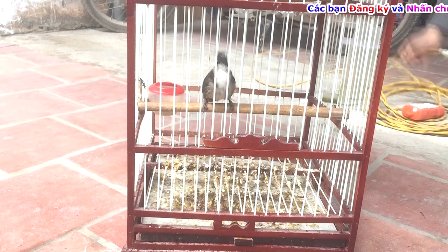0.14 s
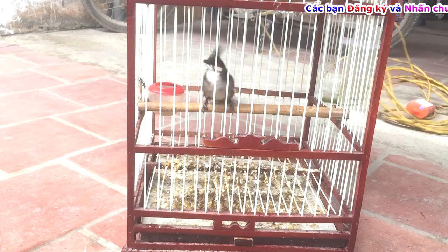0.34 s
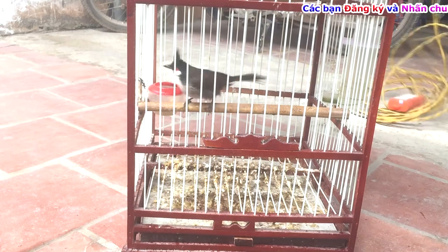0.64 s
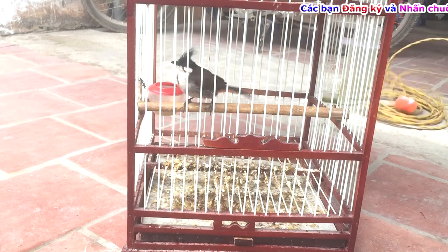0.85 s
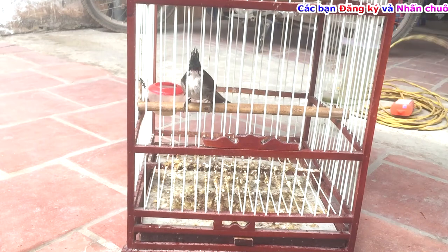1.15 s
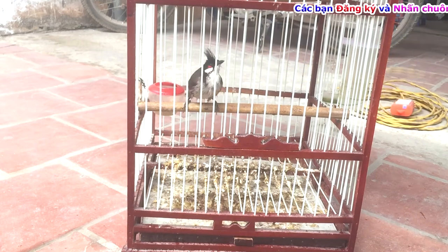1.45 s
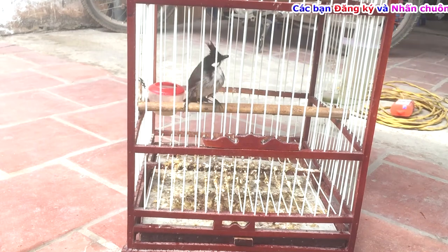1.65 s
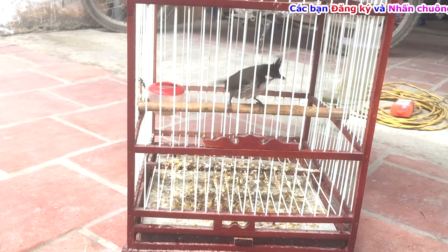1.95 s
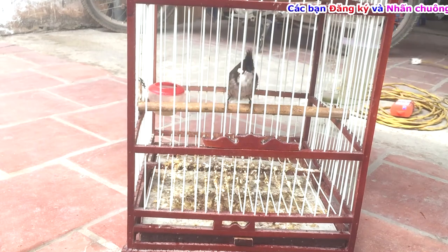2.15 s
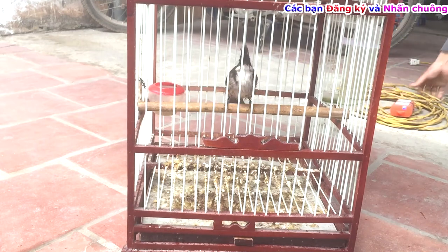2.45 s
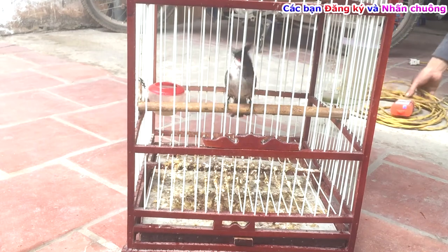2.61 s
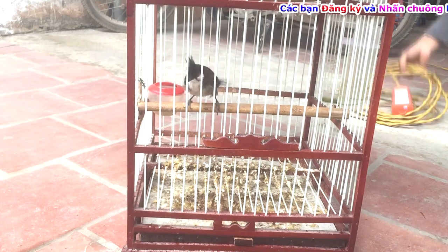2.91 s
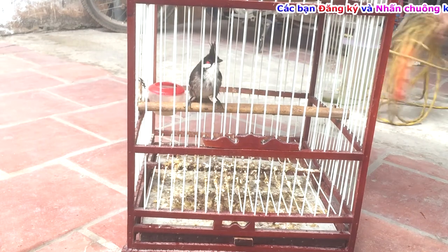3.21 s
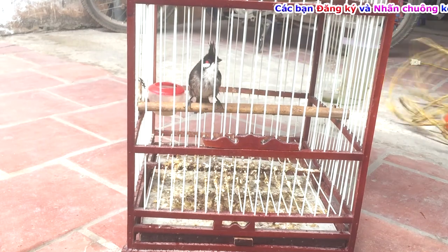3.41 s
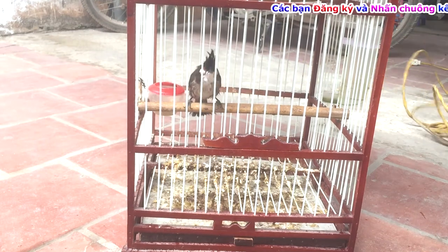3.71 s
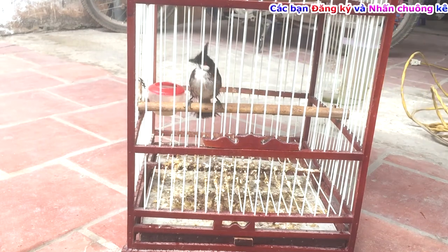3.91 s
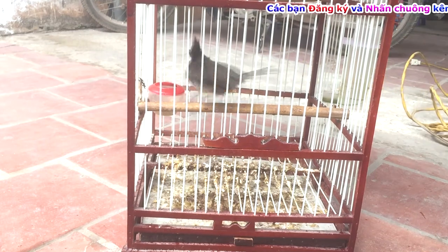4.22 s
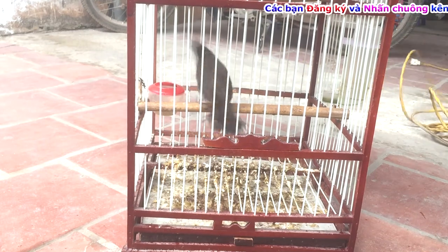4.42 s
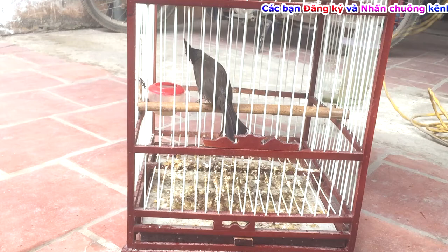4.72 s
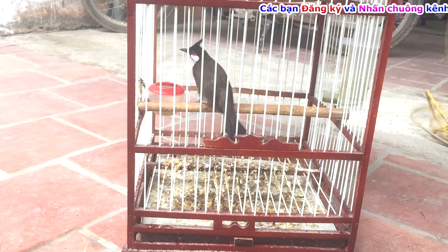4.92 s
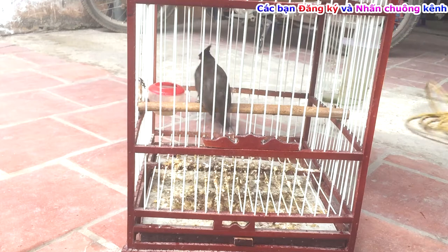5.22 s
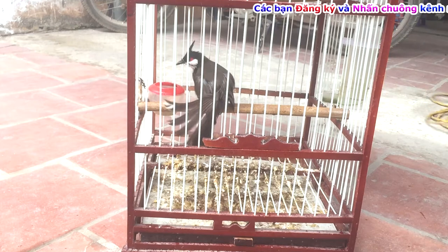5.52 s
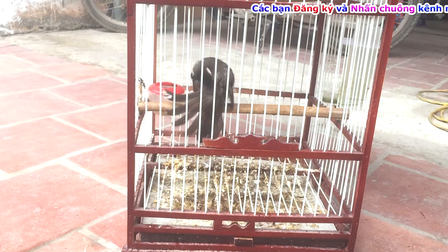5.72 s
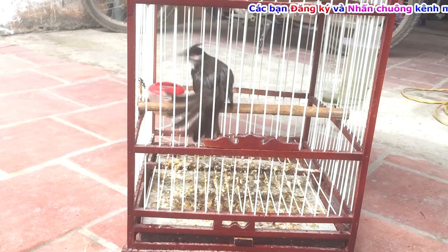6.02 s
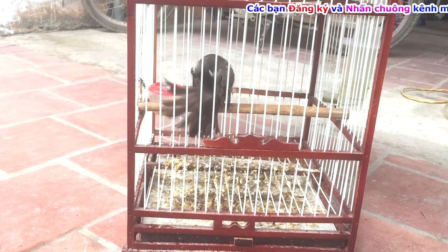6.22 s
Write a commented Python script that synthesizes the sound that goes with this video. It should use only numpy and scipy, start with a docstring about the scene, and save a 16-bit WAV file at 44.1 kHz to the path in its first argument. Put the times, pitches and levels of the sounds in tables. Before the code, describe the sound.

A tiled, walled yard with short bright echoes, heard from one microphone. The tail of a chirp opens over faint air and low traffic. From 0.25 to 1.1 seconds a cord slaps and rasps across the paving; its hollow plastic box knocks strongly at 0.94 and more softly at 1.22. A quick warbling chirp comes at 1.6, with light claw ticks and a feather flutter around 1.7 to 1.8. Faint far whistles follow, then the plug hits with one hard, bright clack at 2.22. Light cord rustles resume near 2.9, a box bump at 3.2, and a stronger knock and gritty drags from 3.45 to 3.8. Another chirp sounds at 3.86. Around 4 to 4.9 it is quieter, with tiny ticks, soft wing air and distant chirps. From 5.1, sharp slaps and sandy scraping return, fading after 6. A distant motorbike hums low, mostly before 4.7.

```python
"""A walled, tiled yard at one microphone: a cord is coiled up behind a caged songbird that hops, flutters and chirps.
The cord slaps and drags over the paving, its socket box knocks and its plug clacks down once: noise bursts and
clicks ring their resonances. Claws and feathers are filtered noise and clicks, birdsong is gliding sines.
Decaying noise makes the walls answer all of these; far off, dry, lie a motorbike of three sines and noise
for air and traffic."""
import sys
import numpy as np
from scipy import signal
from scipy.fft import rfft, irfft
from scipy.io import wavfile
from scipy.ndimage import uniform_filter1d

SR = 44100
rng = np.random.default_rng(int(sys.argv[2]) if len(sys.argv) > 2 else 0)


def store_pcm(level_fs):
    """Save levels as 16-bit WAV."""
    pcm = np.round(np.clip(level_fs, -1, 1) * 32767).astype(np.int16)
    wavfile.write(sys.argv[1], SR, np.atleast_2d(pcm).T)


N = 280035
TIME = np.arange(N) / SR  # s

# Loops of cord slapping the paving; the blow at 3.527 s is probably the socket box's second bump.
# Each row: time in s, level in dB, tick and thud in dB relative to it.
CORD_SLAPS = [(0.302, -29, -13, -12), (0.491, -39, -15, -3), (0.557, -38, -14, -27),
              (0.600, -29.5, -20, -33), (0.632, -27, -11, -24), (1.131, -35, -17, -28),
              (1.195, -32.5, -41, -13), (2.181, -39.5, -3.5, -12), (2.8, -38.5, -18, -15),
              (2.914, -38.5, -20, -21), (2.941, -36.5, -15.5, -15), (3.029, -37, -13.5, -24),
              (3.149, -40.5, -17, -17), (3.435, -40, -14.5, -26), (3.527, -32.5, 3.5, 6.5),
              (3.694, -34, -15, -19), (3.731, -41, 2, -14), (3.767, -28.5, -6.5, -21),
              (3.815, -29, -13.5, -29), (4.669, -50, -8, -16), (5.085, -38.5, -6, -14.5),
              (5.124, -27, -10.5, -18), (5.145, -23, -11.5, -29), (5.359, -26.5, -10.5, -38),
              (5.475, -41, -4, -25), (5.521, -37, -7, -34), (5.893, -35, -8, -7), (6.091, -39, 0.5, -7)]
# Pulls dragging the cord. Each row: start, swell and fade in s, level in dB,
# then rasp, grit and rumble in dB relative to it, before the mix trims in cord_drag.
CORD_PULLS = [(0.249, 0.044, 0.15, -41.5, -8.5, -14.5, -2), (0.543, 0.017, 0.57, -37.5, -4.5, -9, -22),
              (1.1, 0.035, 0.13, -46.5, -4.5, -11, -13), (2.905, .03, 0.43, -48, -6, -23, -8),
              (3.439, 0.11, 0.095, -31, -8.5, -7.5, -7), (3.715, 0.087, .1, -27.5, -9.5, -5.5, -17.5),
              (5.088, 0.11, .28, -27.5, -10, -6.5, -13.5), (5.321, 0.042, 0.22, -37, -12.5, -4.5, -13),
              (5.411, 0.12, 0.1, -44, -12, -7.5, -3.5), (5.584, 0.022, .17, -35.5, -9, -5.5, -10.5),
              (5.63, 0.044, .22, -36, -18, -10, -4), (5.79, .2, 0.36, -29, -13, -8.5, -5)]
# Broad spectra of the cord: coil body, rasp, sandy grit, rumble, thud on paving. Each row: frequency in Hz, dB.
COIL_SPECTRUM = [(300, -30.5), (620, -3.5), (850, 4.5), (1300, 5), (2100, -4), (3200, -4), (4500, -21),
                 (7000, -35)]
RASP_SPECTRUM = [(900, -20.5), (1600, 2.5), (2300, -1.5), (3100, -3), (4500, -21)]
GRIT_SPECTRUM = [(2000, -0.5), (4000, 5.5), (6200, 1.5), (7500, -3.5), (9500, -9), (12000, -6.5),
                 (16000, -10.5)]
RUMBLE_SPECTRUM = [(80, -14), (140, 0), (240, 1.5), (340, -6.5), (550, -8.5), (900, -27.5)]
THUD_SPECTRUM = [(50, -33), (105, 5.5), (160, 2.5), (240, 2.5), (340, -7), (500, -8), (900, -38)]
# Rings of the coil on tile and of the scraping. Each row: frequency in Hz, width in Hz, lift in dB.
COIL_RINGS = [(818.6, 26, 11), (994, 78, 10.5), (1105, 47, 5), (1244, 74, 11), (1390, 30, -0.5),
              (1596, 10, -2.5), (1743, 32, 11.5), (2055, 170, 10.5), (2810, 59, 8)]
GRIT_RINGS = [(4100, 100, 4), (5330, 140, 6), (6060, 260, 5), (8510, 150, 6.5), (9270, 320, 8),
              (11300, 120, 7)]
# The socket box bumps on the ground. Each row: time in s, level in dB, tick and thud in dB relative to it.
SOCKET_KNOCKS = [(0.9385, -16.5, -22, -7), (1.2215, -26, -22.5, -2.5), (3.2068, -31.5, -20, -3),
                 (3.4865, -22, -10.5, -2)]
# Spectrum of the socket box. Each row: frequency in Hz, dB.
SOCKET_SPECTRUM = [(250, -11.5), (550, -11), (800, -2.5), (1500, 0.5), (2300, -6), (3600, -10.5),
                   (5500, -20.5), (8000, -23.5)]
# Its hollow ring. Each row: frequency in Hz, width in Hz, lift in dB.
SOCKET_RINGS = [(804, 150, 11.5), (1040, 28, -1), (1224, 33, 5.5), (1720, 47, 2), (1900, 53, 9),
                (2743, 63, 4.5), (3250, 24, 9)]
# The plug touches, lands and rebounds. Each row: time in s, level in dB before the two paths, brightness in Hz.
PLUG_CONTACTS = [(2.217, -25.5, 2000), (2.2176, -10.5, 12000), (2.2233, -28, 2400)]
# Spectrum of the plug. Each row: frequency in Hz, dB.
PLUG_SPECTRUM = [(60, -17), (180, -10), (550, -2), (1000, -1.5), (1700, 2), (2600, 3), (3400, -1),
                 (7000, -6.5), (12000, -5.5), (16000, -6.5)]
# Ring of the plug, direct. Each row: frequency in Hz, width in Hz, lift in dB.
PLUG_RINGS = [(1420, 73, 9), (1555, 66, 6), (2347, 220, 1.5), (2570, 200, 1.5), (4580, 180, 8),
              (5400, 190, 6.5), (8540, 560, 13.5), (9800, 630, 9.5), (13900, 900, 12.5)]
# Light ticks of claws on perch and bars. Each row: time in s, level in dB.
CLAW_TICKS = [(0.14, -50.5), (0.285, -50), (1.707, -46), (1.7744, -39), (1.815, -39), (2.012, -49),
              (2.1109, -55.5), (4.368, -60), (4.3914, -58), (4.7177, -45.5), (4.799, -46.5)]
# Wing flutters. Each row: start, swell and fade in s, level in dB, air puff in dB relative to it.
WING_FLUTTERS = [(1.703, 0.12, 0.028, -48, -7), (3.96, 0.16, 0.092, -55.5, -17),
                 (4.708, .06, 0.26, -58, 13.5)]
# Spectra of claws, feather rustle and pushed air. Each row: frequency in Hz, dB.
CLAW_SPECTRUM = [(800, -6.5), (3500, -1), (8000, -2.0), (15000, -6)]
FEATHER_SPECTRUM = [(200, -30.5), (700, -6), (2500, 7.5), (5000, -4), (9000, -5), (15000, -12)]
PUFF_SPECTRUM = [(100, -21.0), (220, 7.5), (350, 2), (600, -9.5), (1200, -7.5)]
# The near bird's chirps. Each row: time of the crest in s, crest pitch in Hz,
# level in dB before the two paths, octave in dB relative to it.
NEAR_CHIRPS = [(-0.025, 3108, -31.5, -24.5), (1.608, 3264, -34, -36.5), (3.856, 3290, -32.5, -45)]
# Far birds' whistles. Each row: start and length in s, start and end pitch in Hz,
# level in dB before the two paths, trill swing in Hz.
FAR_WHISTLES = [(1.835, 0.22, 1637, 1575, -58.5, 199.5), (1.85, .27, 2204, 2074, -62.5, 301),
                (2.546, .122, 7380, 5360, -54.5, -1100), (4.532, 0.043, 2355, 2310, -63.5, 100.5),
                (4.745, 0.062, 2800, 2750, -57, -200), (4.791, .05, 3136, 3150, -55.5, 48),
                (4.983, 0.017, 3200, 3140, -63, 30.5)]
# Far motorbike. Each row: time in s, pitch of its strongest line in Hz, level in dB; both waver a little.
ENGINE_LINE = [(0, 113.2, -52), (0.75, 114, -66), (1.15, 122, -49), (1.5, 127.8, -45.5), (2.15, 127.5, -58),
               (2.42, 116.9, -48), (3.1, 115.5, -50.5), (3.35, 110.6, -57), (3.7, 103.4, -46.5),
               (4.02, 104.6, -60), (4.35, 106, -46.5), (4.75, 104, -74), (6.35, 98, -70)]
# Its lower neighbour line, which swells as it pulls. Each row: time in s, level in dB.
ENGINE_PULL = [(0, -60), (1.3, -58.5), (1.6, -51.5), (2.1, -46), (2.3, -55), (6.35, -91)]
# Spectra of open air and traffic rumble. Each row: frequency in Hz, dB.
AIR_SPECTRUM = [(15, -47), (25, -17), (82, -5.5), (123, 2), (200, -10), (263, -5), (427, -24.5),
                (641, -14.5), (734, -28), (962, -19), (2350, -27), (3720, -34.5), (12500, -46),
                (16000, -51)]
TRAFFIC_SPECTRUM = [(32, -29), (50, 1.0), (80, -1.5), (140, -0.5), (270, -12.5), (600, -24.5)]
# Slow swell of the traffic. Each row: time in s, dB relative to its base level.
TRAFFIC_SWELL = [(0, -2.5), (0.9, 6.5), (1.8, 8.5), (2.7, 2.5), (3.8, 2), (4.7, -2), (6.35, 2)]
# Reverberation of the yard. Each row: frequency in Hz, time to fall by 60 dB in s.
YARD_DECAY = [(150, 0.31), (400, 0.81), (1000, 0.66), (2700, 0.64), (6000, 0.52), (10000, .42),
              (15000, 0.27)]

# chirp timing (s)
CHIRP_RISE_S, CHIRP_HOLD_S, CHIRP_RELEASE_S = 0.03, 0.058, 0.021
# level lost over the rise or release time, and over the hold
CHIRP_EDGE_DB, CHIRP_SINK_DB = 21, 5.5
# rise to the crest, fall over the hold, deepest dip below the crest
CHIRP_SCOOP_HZ, CHIRP_SAG_HZ, CHIRP_TRILL_HZ = 405, 72, 1017.4
# dips are brief at the crest (exponent 4) and lengthen over this time
TRILL_OPEN_S, TRILL_BREVITY = 0.04, 4


def cord_slaps():
    """Blows on the tiles, mostly dropping loops of cord, ring the coil."""
    return blows(CORD_SLAPS, COIL_SPECTRUM, COIL_RINGS, contact_ms=3.2, wet_db=-2)


def cord_drag(body_db=-4, grit_trim_db=-6, rumble_trim_db=-5):
    """Catches on the tiles make dense clicks that ring the coil; rasp and sandy grit come and go with the ground."""
    catches = grains(rate=2200, spread_db=2.5) * undb(1.6 * walk(60))
    body = unit(colour(catches, COIL_SPECTRUM, COIL_RINGS))

    rasp = colour(grains(rate=1500, spread_db=-2.5), RASP_SPECTRUM)
    rasp = unit(rasp * undb(1.5 * walk(25)))

    sand = grains(rate=450, spread_db=1.5)
    grit = colour(catches + sand, GRIT_SPECTRUM, GRIT_RINGS)
    grit = unit(grit * undb(1.3 * walk(30)))

    rumble = unit(colour(grains(rate=2200, spread_db=1), RUMBLE_SPECTRUM))

    out = np.zeros(N)
    for start_s, swell_s, fade_s, db, rasp_db, grit_db, rumble_db in CORD_PULLS:
        scrape = undb(body_db) * body + undb(rasp_db) * rasp
        scrape += undb(grit_db + grit_trim_db) * grit
        scrape += undb(rumble_db + rumble_trim_db) * rumble
        speed = stroke(start_s, swell_s, fade_s, swell_db=17.5, fade_db=33)
        out += speed * undb(db) * scrape
    return yard(out, wet_db=-6)


def socket_knocks():
    """The hollow socket box is tugged over and bumps down."""
    return blows(SOCKET_KNOCKS, SOCKET_SPECTRUM, SOCKET_RINGS, contact_ms=3.4, wet_db=-1)


def blows(rows, body, rings, contact_ms, wet_db, lead_s=0.0065, lead_db=-19):
    """Each blow has a faint noise lead-in, then lands with a ringing body, a gritty tick and a soft thud."""
    near, around = np.zeros(N), np.zeros(N)
    for s, db, tick_db, thud_db in rows:
        parts = (
            (body, rings, db),
            (GRIT_SPECTRUM, GRIT_RINGS, db + tick_db),
            (THUD_SPECTRUM, (), db + thud_db),
        )
        for points, part_rings, part_db in parts:
            lead_in = colour(contact(2 * contact_ms), points, part_rings)
            landing = colour(contact(contact_ms), points, part_rings)
            add(near, s - lead_s, lead_in, part_db + lead_db)
            add(near, s, landing, part_db)
            add(around, s, colour(tap(), points, part_rings), part_db)
    return near + undb(wet_db) * echoes(around, early_db=0.5)


def plug(direct_db=1, wet_db=-3, wall_ring=0.59):
    """Hard plastic on tile: a push and a millisecond of chatter ring the shell; the walls hear it more evenly."""
    near, around = np.zeros(N), np.zeros(N)
    wall_rings = [(hz, width, wall_ring * lift_db) for hz, width, lift_db in PLUG_RINGS]
    for s, db, bright_hz in PLUG_CONTACTS:
        softness = signal.butter(1, bright_hz, fs=SR)
        push = signal.lfilter(*softness, tap() + 0.28 * contact(ms=0.7))
        wall_push = signal.lfilter(*softness, tap())
        add(near, s, colour(push, PLUG_SPECTRUM, PLUG_RINGS), db)
        add(around, s, colour(wall_push, PLUG_SPECTRUM, wall_rings), db)
    return undb(direct_db) * near + undb(wet_db) * echoes(around, early_db=-25)


def bird_moves(beat_hz=26, beat_db=2):
    """Claws tick on the perch; feathers rustle and push air with every wingbeat."""
    out = np.zeros(N)
    for s, db in CLAW_TICKS:
        add(out, s, colour(contact(ms=4.5), CLAW_SPECTRUM), db)

    unsteady_hz = beat_hz * (1 + 0.2 * walk(13))
    beats = undb(beat_db * np.sin(2 * np.pi * np.cumsum(unsteady_hz) / SR))
    rustle = unit(colour(grains(rate=6200, spread_db=0), FEATHER_SPECTRUM))
    puff = unit(colour(rng.standard_normal(N), PUFF_SPECTRUM))
    for start_s, swell_s, fade_s, db, puff_db in WING_FLUTTERS:
        effort = stroke(start_s, swell_s, fade_s, swell_db=7, fade_db=18.5)
        out += effort * beats * undb(db) * (rustle + undb(puff_db) * puff)
    return yard(out, wet_db=-3.5)


def birdsong(direct_db=-7, trill_hz=80):
    """Quick warbling glides, heard mostly off the walls, which smear them into a band."""
    # the pitch rests on the note and flicks away from it once every trill cycle
    unsteady_hz = trill_hz * (1 + 0.21 * walk(80))
    trill = np.sin(np.pi * np.cumsum(unsteady_hz) / SR) ** 2
    song = chirps(trill) + whistles(trill)
    return undb(direct_db) * song + echoes(song, early_db=-4, early_s=0.045, build_s=0.001)


def chirps(trill):
    """Each chirp scoops up to its crest, then dips from it to a low note for longer and longer."""
    out = np.zeros(N)
    for crest_s, hz, db, octave_db in NEAR_CHIRPS:
        age = TIME - crest_s
        before = np.maximum(-age / CHIRP_RISE_S, 0)
        after = np.maximum((age - CHIRP_HOLD_S) / CHIRP_RELEASE_S, 0)
        held = np.clip(age / CHIRP_HOLD_S, 0, 1)

        high = hz - CHIRP_SCOOP_HZ * np.minimum(before, 1) - CHIRP_SAG_HZ * held
        low = hz - CHIRP_TRILL_HZ
        dip = trill ** np.interp(age, [0, TRILL_OPEN_S], [TRILL_BREVITY, 1])
        pitch = high * (1 - dip) + low * dip

        level_db = db - CHIRP_EDGE_DB * (before + after) - CHIRP_SINK_DB * held
        out += undb(level_db) * syrinx(pitch, octave_db)
    return out


def whistles(trill):
    """Faint straight glides, flicked by the trill, that swell and fade in one arch."""
    out = np.zeros(N)
    for start_s, length_s, from_hz, to_hz, db, swing_hz in FAR_WHISTLES:
        along = np.clip((TIME - start_s) / length_s, 0, 1)
        arch = np.sqrt(4 * along * (1 - along))
        pitch = from_hz + (to_hz - from_hz) * along + swing_hz * trill
        out += undb(db) * arch * syrinx(pitch)
    return out


def syrinx(hz, octave_db=-32, waver=0.0088):
    """A bird's tone: a slightly unsteady sine with a faint octave."""
    phase = 2 * np.pi * np.cumsum(hz * (1 + waver * walk(500))) / SR
    return np.sqrt(2) * (np.sin(phase) + undb(octave_db) * np.sin(2 * phase))


def motorbike(upper_db=-3):
    """Only the lowest exhaust lines carry this far, wavering on the way."""
    hz, db = curve(ENGINE_LINE)
    pull_db, = curve(ENGINE_PULL)
    phase = 2 * np.pi * np.cumsum(hz * (1 + 0.003 * walk(8))) / SR
    out = np.zeros(N)
    # strongest line, then its lower and upper neighbours
    for order, level_db in ((1, db), (4 / 5, pull_db), (6 / 5, pull_db + upper_db)):
        out += np.sqrt(2) * undb(level_db + walk(3)) * np.sin(order * phase)
    return out


def street(air_db=-54, rumble_db=-56.5):
    """Faint open air over a slowly swelling traffic rumble, both filtered noise."""
    air = unit(colour(rng.standard_normal(N), AIR_SPECTRUM))
    rumble = unit(colour(rng.standard_normal(N), TRAFFIC_SPECTRUM))
    swell_db, = curve(TRAFFIC_SWELL)
    air_level = undb(air_db + 0.8 * walk(3))
    rumble_level = undb(rumble_db + swell_db + walk(1.5))
    return air * air_level + rumble * rumble_level


def yard(x, wet_db):
    """Direct sound plus the walls."""
    return x + undb(wet_db) * echoes(x, early_db=4)


def echoes(x, early_db, early_s=0.012, build_s=0.007):
    """Dense echoes of the yard: noise whose bands die at their own rates, with extra strength early on."""
    t = TIME[:SR]
    noise = rfft(rng.standard_normal(SR))
    log_hz = np.log(np.arange(len(noise)) + 1)
    centres = np.log([hz for hz, _ in YARD_DECAY])
    tail = np.zeros(SR)
    # each band overlaps its neighbours in a triangle
    for share, (_, t60) in zip(np.eye(len(centres)), YARD_DECAY):
        band = irfft(noise * np.interp(log_hz, centres, share), SR)
        tail += band * undb(-60 * t / t60)
    tail *= np.minimum(t / build_s, 1) * (1 + undb(early_db) * np.exp(-t / early_s))
    return signal.fftconvolve(x, tail / np.sqrt(np.sum(tail ** 2)))[:N]


def contact(ms, size=4096):
    """A burst of micro-impacts that builds and dies on the scale of the contact time."""
    age = np.arange(size) / (SR * ms / 1000)
    return rng.standard_normal(size) * np.sqrt(age) * np.exp(-age)


def tap(size=4096):
    """One clean impulse: a blow as the walls hear it, evened out over all directions."""
    return 1.0 * (np.arange(size) == 0)


def grains(rate, spread_db):
    """Tiny clicks at random times (rate per second); a positive spread makes a few strong, a negative one weak."""
    struck = rng.random(N) < rate / SR
    rarity = np.minimum(rng.exponential(size=N), 4)
    return struck * rng.standard_normal(N) * undb(spread_db * rarity)


def stroke(start_s, swell_s, fade_s, swell_db, fade_db, onset_s=0.006):
    """Envelope of one movement: it sets in, gathers speed, then dies away."""
    age = TIME - start_s
    gathering_db = swell_db * (age / swell_s - 1)
    dying_db = -fade_db * (age - swell_s) / fade_s
    return np.clip(age / onset_s, 0, 1) * undb(np.minimum(gathering_db, dying_db))


def add(out, s, hit, db, span_s=0.0023):
    """Place a hit whose energy equals that level held for span_s."""
    start = int(s * SR)
    hit = hit * undb(db) * np.sqrt(span_s * SR / np.sum(hit ** 2))
    out[start:start + len(hit)] += hit[:N - start]


def colour(x, points, rings=(), size=4096):
    """Causal filter: a broad spectrum that falls 10 dB an octave past its ends, lifted at each resonance."""
    hz = np.arange(size // 2 + 1) * SR / size + 1
    octaves_out = np.abs(np.log2(hz / np.clip(hz, points[0][0], points[-1][0])))
    db = on_log_axis(hz, points) - 10 * octaves_out
    for f, width, lift_db in rings:
        db = db + lift_db / (1 + (2 * (hz - f) / width) ** 2)
    # fold the cepstrum so that the response starts at once (minimum phase)
    cepstrum = irfft(np.log(undb(db)))
    cepstrum[1:size // 2] *= 2
    cepstrum[size // 2 + 1:] = 0
    response = irfft(np.exp(rfft(cepstrum)))
    return signal.fftconvolve(x, response)[:len(x)]


def on_log_axis(hz, points):
    """Read (Hz, value) points at any frequency, along a logarithmic axis."""
    f, value = np.transpose(points)
    return np.interp(np.log(hz + 1), np.log(f), value)


def curve(rows):
    """The columns of a table, joined by straight lines in time."""
    s, *columns = np.transpose(rows)
    return [np.interp(TIME, s, column) for column in columns]


def walk(rate):
    """Smooth random wander of rms 1, with rate new targets per second."""
    k = int(SR / rate)
    steps = np.repeat(rng.standard_normal(N // k + 1), k)
    return unit(uniform_filter1d(steps, k)[:N])


def unit(x):
    """Scale to rms 1."""
    return x / np.sqrt(np.mean(x ** 2) + 1e-18)


def undb(db):
    """Decibels to gain."""
    return 10 ** (np.asarray(db) / 20)


def scene():
    """Everything in the yard, heard at one point."""
    cord = cord_slaps() + cord_drag() + socket_knocks() + plug()
    bird = bird_moves() + birdsong()
    distance = motorbike() + street()
    return (cord + bird + distance)[None]


def record(dry):
    """The recorder thins the deep bass, rounds the loudest peaks and cuts the top."""
    bass_cut = signal.butter(3, 36, "high", fs=SR, output="sos")
    top_cut = signal.ellip(10, 0.2, 70, 15800, fs=SR, output="sos")
    rounded = np.tanh(signal.sosfilt(bass_cut, dry))
    return signal.sosfilt(top_cut, rounded)


dry = scene()
out = record(dry)
store_pcm(out)
```